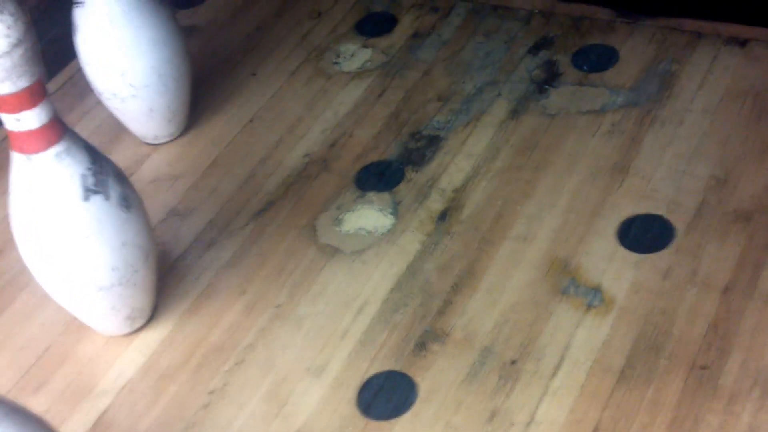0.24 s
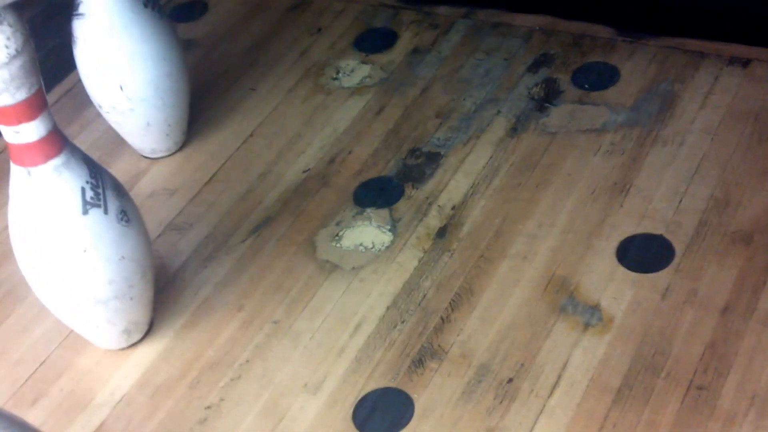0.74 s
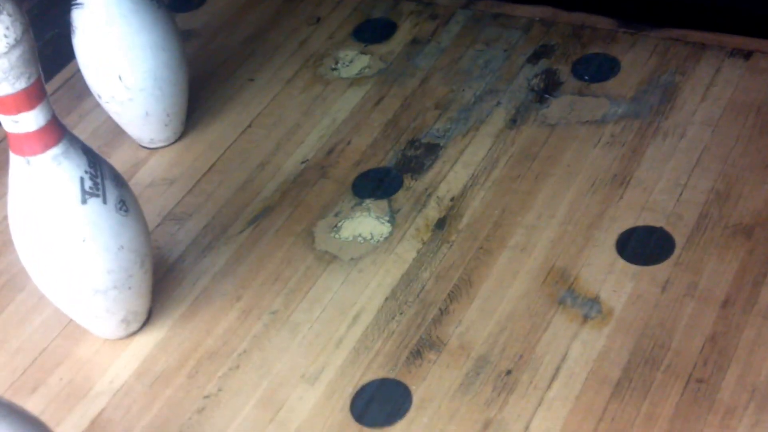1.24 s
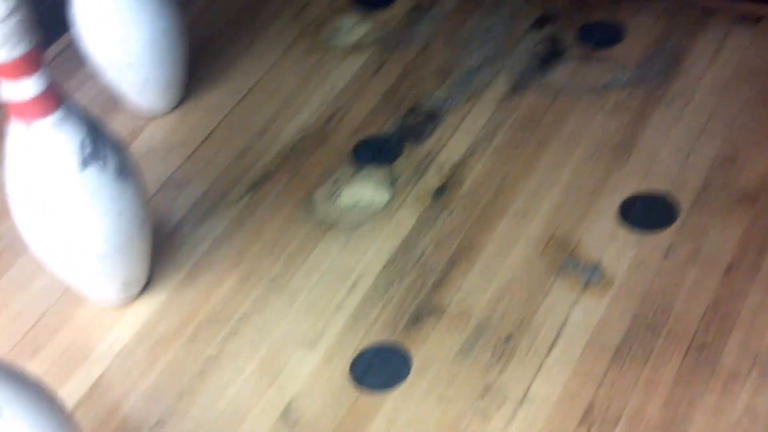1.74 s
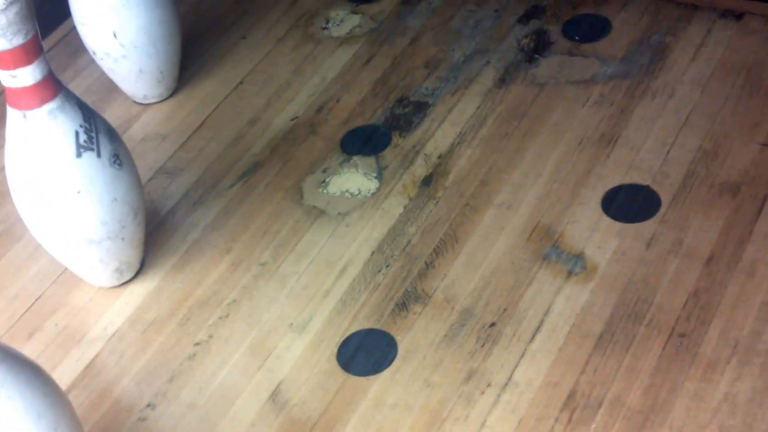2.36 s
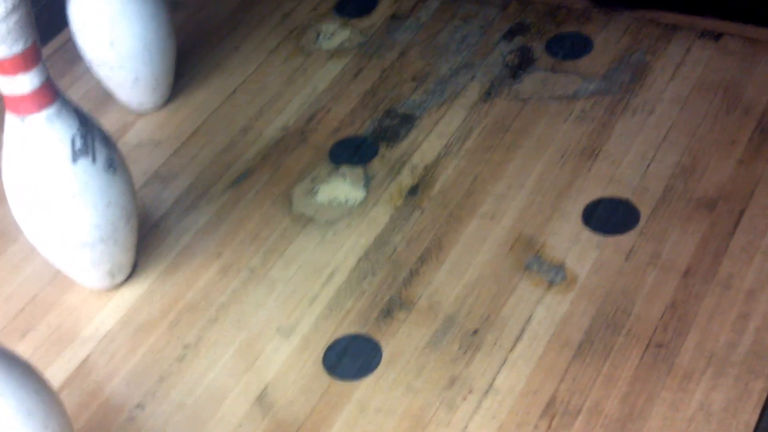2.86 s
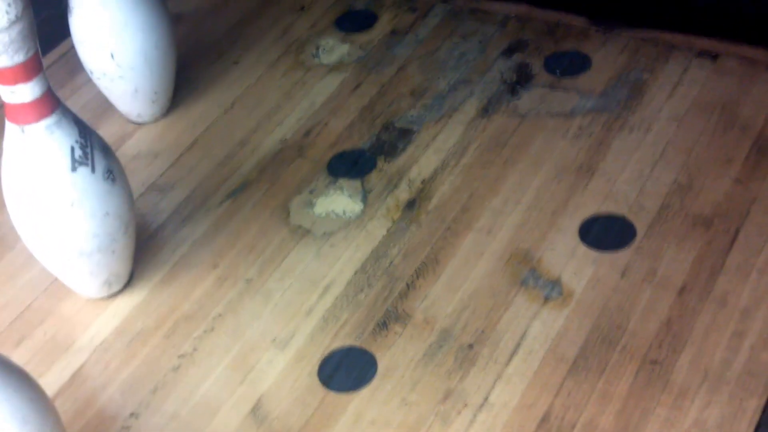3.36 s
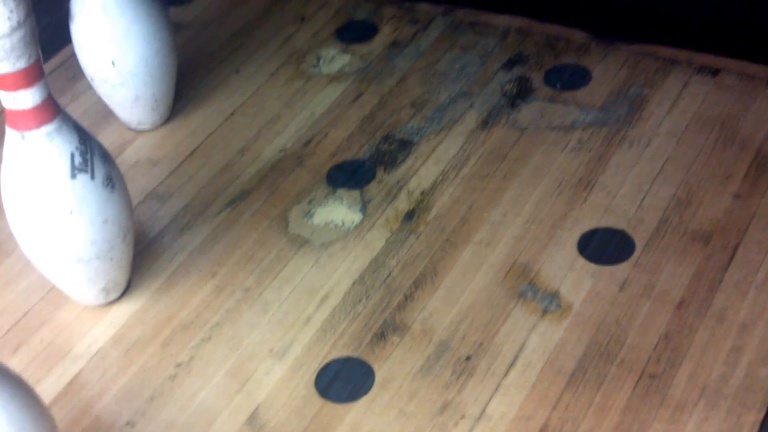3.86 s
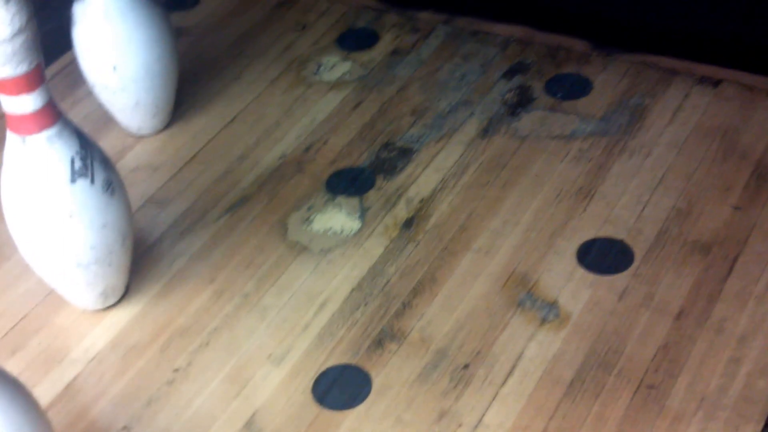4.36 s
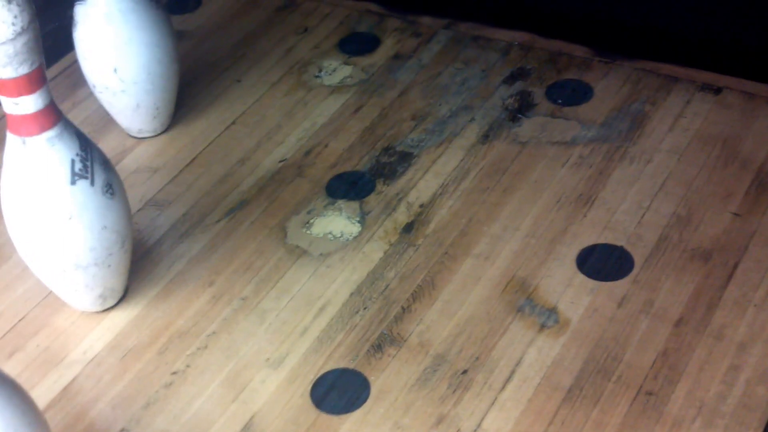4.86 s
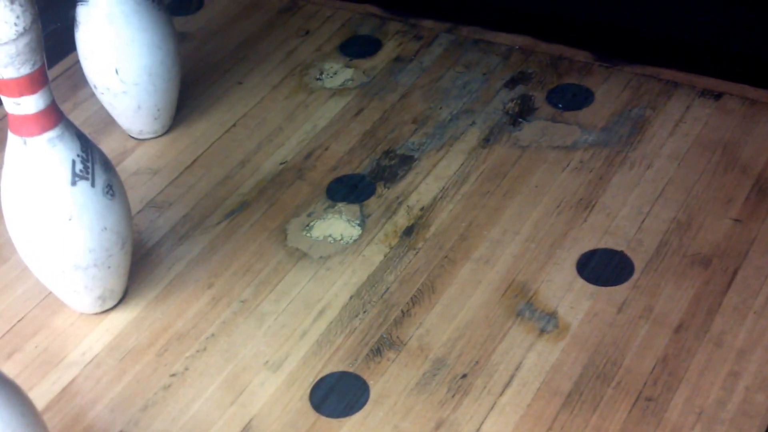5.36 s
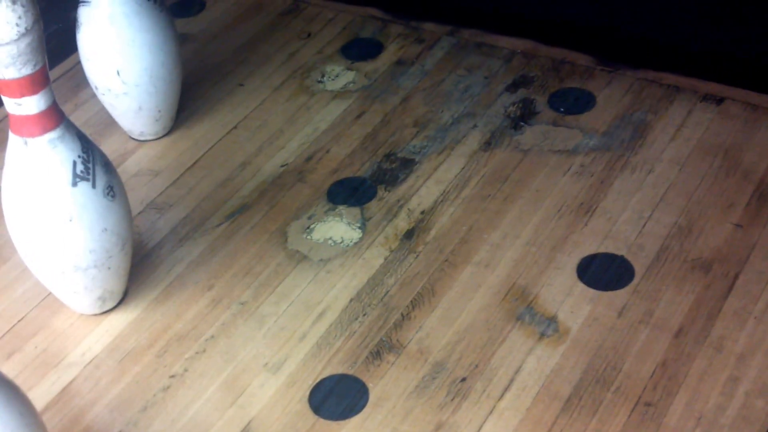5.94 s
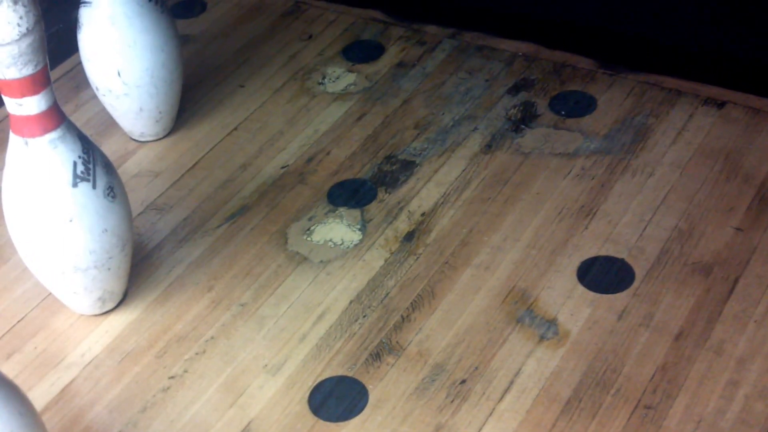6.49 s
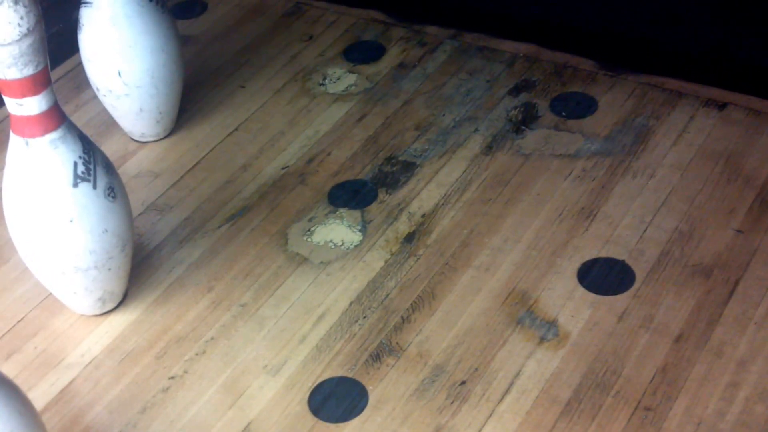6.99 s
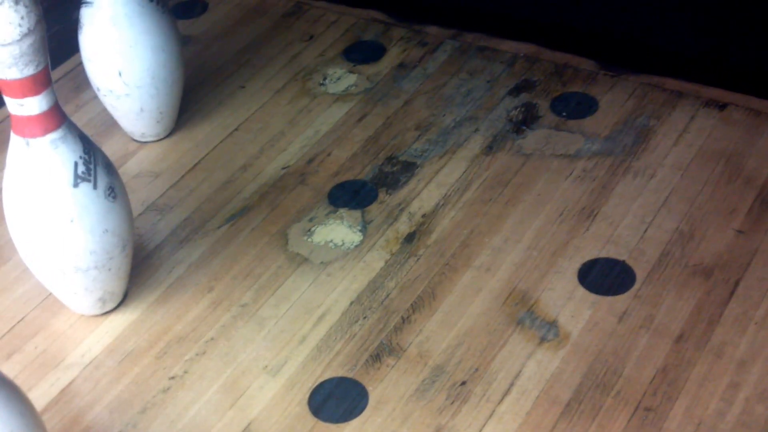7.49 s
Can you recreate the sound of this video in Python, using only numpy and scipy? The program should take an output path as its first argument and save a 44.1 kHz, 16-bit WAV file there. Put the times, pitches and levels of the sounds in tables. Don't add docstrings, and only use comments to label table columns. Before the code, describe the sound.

A continuous mechanical drone, whining on one unwavering pitch, with low hum, resonant metal housing and rough hiss. A few faint metallic ticks lead to one hard double-striking clack that jolts the whirr. The sound is suddenly quieter, then gradually swells to a steady level. Muffled wooden thumps, occasional higher knocks and small bright chain puffs continue behind it. Wide stereo from a small camera microphone, with the whine leaning right.

```python
import sys
import numpy as np
from scipy import signal
from scipy.fft import rfft, irfft, next_fast_len
from scipy.io import wavfile
from scipy.ndimage import uniform_filter1d, map_coordinates

SR = 44100
rng = np.random.default_rng(int(sys.argv[2]) if len(sys.argv) > 2 else 0)


def file_out(sig):
    cols = np.atleast_2d(sig).T
    lim = np.clip(cols, -1, 1)
    pcm = np.round(lim * 32767).astype(np.int16)
    wavfile.write(sys.argv[1], SR, pcm)


def gain_from_db(level_db):
    decades = np.asarray(level_db, float) / 20
    return 10 ** decades


N = 340452


def unit(x):
    return x / np.sqrt(np.mean(x ** 2) + 1e-20)


def along(points, hz, column=1):
    rows = np.array(points)
    return np.interp(np.log(hz + 1), np.log(rows[:, 0] + 1), rows[:, column])


def wobble(rate_hz):
    knots = rng.standard_normal(int(N * rate_hz / SR) + 4)
    return map_coordinates(knots, [np.arange(N) * rate_hz / SR])


def filtered(x, response):
    size = next_fast_len(N + 8192)
    hz = np.fft.rfftfreq(size, 1 / SR)
    return irfft(rfft(x, size) * response(hz), size)[..., :N]


def patchy(depth_db):
    z = signal.stft(rng.standard_normal((2, N)), nperseg=1024)[2]
    field = rng.standard_normal(z.shape[1:])
    for axis in (0, 1):
        field = uniform_filter1d(field, size=3, axis=axis)
    return signal.istft(z * gain_from_db(depth_db * unit(field)), nperseg=1024)[1][:, :N]


# frequency_hz, left_minus_right_db, coherence [0-1], left_lead_rad
PORTS = [(70.0, -5.1, 0.6, 1.26), (110.0, -5.8, 0.75, 0.78), (180.0, -3.6, 0.93, 0.34),
         (270.0, -4.3, 0.93, 0.19), (400.0, -7.3, 0.89, -0.0), (520.0, -6.8, 0.9, -0.38),
         (700.0, -8.4, 0.66, -0.72), (950.0, -3.2, 0.6, -0.52), (1200.0, -3.7, 0.27, -0.71),
         (1750.0, -3.0, 0.4, -3.56), (2300.0, -4.2, 0.02, -3.56), (4000.0, -2.5, 0.11, -3.56),
         (8000.0, -2.0, 0.05, -3.56), (11500.0, 1.1, 0.03, -3.56)]


def at_ports(pair, gain):
    def mixing(hz):
        angle = np.arccos(np.clip(along(PORTS, hz, column=2), 0, 1)) / 2
        return gain(hz) * np.array([np.cos(angle), np.sin(angle)])

    def balance(hz):
        left = gain_from_db(along(PORTS, hz) / 2) * np.exp(.5j * along(PORTS, hz, column=3))
        return [left, 1 / left]

    alike, apart = filtered(pair, mixing)
    return filtered(np.array([alike + apart, alike - apart]), balance)


MESH_HZ = 596.2
# multiple, right_db, left_minus_right_db, left_lead_rad
WHINE = [(1, -14.7, -10.8, -.5), (2, -50, 8.1, -.3), (3, -38, -24.5, .5), (4, -43.7, -5.6, 2.5),
         (5, -37, -15, -2.6), (6, -45.5, -12.4, 2.6), (7, -63, 10.2, -.1), (8, -54, -14.7, .2)]


def whine(level_db):
    phase = 2 * np.pi * np.cumsum(MESH_HZ + 0.32 * wobble(8)) / SR
    tone = 0
    for multiple, db, left_db, lead in WHINE:
        level = gain_from_db(db + 2.6 + .45 * multiple + .7 * wobble(25))
        left = gain_from_db(left_db) * np.sin(multiple * phase + lead)
        tone = tone + level * np.array([left, np.sin(multiple * phase)])
    return gain_from_db(level_db) * tone, phase


# frequency_hz, width_hz, level_db
HOUSING = [(165, 9.1, 9), (190, 24, 4.5), (264, 8.1, 3.5), (479.6, 97, 7), (888, 28, -2.5), (1311, 13, 5.5),
           (1403, 15, 1), (1903, 98, 2), (2136, 20, 3), (4060, 100, 3)]


def housing(hz):
    modes = sum(gain_from_db(2 * db) / (1 + (2 * (hz - centre) / width) ** 2) for centre, width, db in HOUSING)
    return np.sqrt(1 + modes)


# frequency_hz, density_db [dB per Hz]
RUMBLE = [(30, -26), (60, -21), (80, -16.5), (100, -7), (135, -6), (215, -6.5), (310, -7), (400, -6.5),
          (650, -7.5), (850, -10), (1050, -21), (1500, -26.5), (3000, -90)]
WHIRR = [(700, -32), (1000, -1), (1300, 2), (1700, 2), (2000, 0.5), (2500, -4.5), (3100, -3.5), (4100, -8),
         (4500, -16.5), (6000, -29), (9000, -90)]
HISS = [(2000, -20), (4400, -2.5), (5200, -6.5), (6200, -4), (7500, -4), (9000, -1.5), (11700, -2),
        (12600, -6), (13400, -8.5), (14200, -7), (15400, -10), (15650, -19)]


def drive(phase, rumble_db, whirr_db):
    rumble, whirr, hiss = patchy(depth_db=0.25), patchy(depth_db=1.5), patchy(depth_db=1.5)
    beat_db = .5 * np.sin(phase / 229) + 1.55 * wobble(8) + 1.56 * wobble(90) + 0.29 * np.sin(phase / 10)
    grit = gain_from_db(0.69 * wobble(1500) + 1.0 * np.sin(phase))
    rumble = rumble * gain_from_db(0.13 * wobble(6))
    whirr = whirr * gain_from_db(0.55 * beat_db) * grit ** .6
    hiss = hiss * gain_from_db(0.18 * beat_db) * grit
    rumble = at_ports(rumble, lambda hz: gain_from_db(along(RUMBLE, hz)) * housing(hz))
    whirr = at_ports(whirr, lambda hz: gain_from_db(along(WHIRR, hz)) * housing(hz))
    hiss = at_ports(hiss, lambda hz: gain_from_db(along(HISS, hz)))
    return gain_from_db(rumble_db - 20) * unit(rumble) + gain_from_db(whirr_db - 27) * unit(whirr) + gain_from_db(-29) * unit(hiss)


def contacts(rows, tilt_db, ring_db, chatter_db):
    out, t = np.zeros((2, N + SR)), np.arange(SR // 3) / SR
    hz = np.fft.rfftfreq(len(t), 1 / SR)
    tilt = gain_from_db(tilt_db * np.log2(hz / 8000 + .05))
    highpass = hz ** 2 / (hz ** 2 + 900 ** 2)
    lowpass = 1 / np.sqrt(1 + (hz / 12500) ** 8)
    colour = tilt * highpass * lowpass
    for start_s, db, t60_s, rise_s, ring_hz in rows:
        bounce = unit(uniform_filter1d(rng.standard_normal(len(t)), size=90))
        chatter = gain_from_db(chatter_db * (1 - np.exp(-t / 0.0096)) * bounce)
        noise = irfft(rfft(rng.standard_normal((2, len(t)))) * colour, len(t))
        burst = unit(chatter * noise)
        drift = np.cumsum(rng.normal(0, 0.082, len(t)))
        ring = gain_from_db(ring_db) * np.sin(2 * np.pi * ring_hz * t + drift)
        fade = gain_from_db(-60 * t / t60_s) * (1 - np.exp(-t / rise_s))
        out[:, round(start_s * SR):][:, :len(t)] += gain_from_db(db) * fade * (burst + ring)
    return at_ports(out[:, :N], lambda hz: gain_from_db(along(HISS, hz) * 0.08))


# start_s, level_db, t60_s, ring_hz
LATCH = [
    (0.9238, -9, 0.035, 6100),
    (0.928, 0.5, 0.099, 10550),
    (.934, -6.5, 0.36, 7230),
    (0.9541, 0.5, 0.055, 10640),
    (.958, 0, 0.092, 1850),
    (0.966, -11.5, 0.26, 9560),
]
STRIKE_S = LATCH[0][0]
# start_s, level_db, rise_s, ring_hz
TICKS = [
    (.103, -22, .004, 9800),
    (.254, -13, 0.0088, 10300),
    (.435, -14.5, 0.011, 7900),
    (1.14, -19.5, .003, 9000),
    (1.266, -14, .002, 9800),
    (1.465, -13.5, .004, 12500),
    (1.472, -19, .002, 9550),
]


def clacks():
    latch = [(s, db, t60, 0.00049, hz) for s, db, t60, hz in LATCH]
    ticks = [(s, db, 0.16, rise, hz) for s, db, rise, hz in TICKS]
    near = contacts(latch, tilt_db=1.2, ring_db=-5, chatter_db=3.5)
    far = contacts(ticks, tilt_db=2.5, ring_db=-10, chatter_db=5.0)
    return near + far


# start_s, peak_db, pitch_hz
THUMPS = [(.47, -21, 190), (.83, -21, 190), (1.02, -23, 310), (1.15, -23, 264), (1.17, -16, 405),
          (1.9, -22.5, 264), (1.91, -20, 165), (2.82, -23, 165), (3.56, -18, 173), (3.6, -19.5, 264),
          (3.71, -24, 172), (4.62, -22, 165), (4.64, -22.5, 264), (5.03, -33, 264), (5.39, -27, 175),
          (5.55, -24, 264), (5.81, -23, 163), (5.92, -21, 171), (6.12, -27, 264), (6.32, -21, 190),
          (6.44, -24.5, 177), (6.47, -24.5, 264), (6.85, -23, 264), (7.07, -22, 264), (7.44, -26, 111),
          (7.61, -22, 165)]
KNOCKS = [
    (.27, -15, 750),
    (4.61, -14.5, 1320),
    (4.86, -14, 1360),
    (6.272, -20, 1280),
    (6.338, -16, 746),
    (7.071, -13, 774),
]


def pins(hits, lift_db, t60_s):
    out, t = np.zeros(N + SR), np.arange(SR // 4) / SR
    for start_s, db, hz in hits:
        overtone = np.sin(2 * np.pi * 1.6 * hz * t + rng.uniform(0, 9.6))
        ring = np.sin(2 * np.pi * hz * t) + 0.15 * overtone
        fade = gain_from_db(db + lift_db - 60 * t / t60_s) * (1 - np.exp(-t / 0.0013))
        out[round(start_s * SR):][:len(t)] += fade * ring
    return at_ports(np.array([out[:N], 0 * out[:N]]), lambda hz: 1)


RATTLE_S = [1.649, 2.179, 2.393, 2.645, 2.889, 3.211, 3.343, 3.674, 4.313, 4.752, 4.952, 5.144, 5.659,
            6.173, 6.752]


def chain():
    t, strikes = np.arange(SR // 8) / SR, np.zeros(N)
    strikes[np.round(np.array(RATTLE_S) * SR).astype(int)] = gain_from_db(-26.5)
    fade = gain_from_db(-60 * t / .15) * (1 - np.exp(-t / .003))
    puffs = signal.fftconvolve(strikes, fade)[:N]
    noise = puffs * rng.standard_normal((2, N))
    return at_ports(noise, lambda hz: gain_from_db(along(HISS, hz) + 1.5 * np.log2(hz / 9000 + .01)))


def motor():
    phase = 2 * np.pi * np.cumsum(57.5 + 0.12 * wobble(3.0)) / SR
    return gain_from_db(-39.5 + 0.8 * wobble(4.67)) * np.array([.3 * np.cos(phase), np.sin(phase)])


def scene():
    since = np.arange(N) / SR - STRIKE_S
    body_db = 13 * (since > 0) * np.exp(-np.abs(since) / 0.11)
    tone, phase = whine(level_db=-0.37)
    machine = gain_from_db(0.83) * (tone + drive(phase, rumble_db=0.82, whirr_db=1.69 + body_db) + motor())
    thumps = pins(THUMPS, lift_db=7.0, t60_s=0.28)
    knocks = pins(KNOCKS, lift_db=3.0, t60_s=0.041)
    return machine + clacks() + thumps + knocks + chain()


def gain_control():
    start_cut_db, duck_cut_db, creep_db_per_s, knee_db = 7, 13.5, 3.5, 0.8
    lag_s, duck_s = 0.003, 0.0023
    t = np.arange(N) / SR
    since = np.clip(t - STRIKE_S - lag_s, 0, None)
    ducked = 1 - np.exp(-since / duck_s)
    first_db = start_cut_db - creep_db_per_s * t
    second_db = duck_cut_db - creep_db_per_s * since
    cut_db = (1 - ducked) * first_db + ducked * second_db
    return gain_from_db(-knee_db * np.logaddexp(0, cut_db / knee_db))


def roll_off(x):
    return signal.sosfilt(signal.butter(12, 15810, fs=SR, output="sos"), x)


def record(dry):
    dry = dry * gain_control()
    delay = 16
    late = np.pad(dry, ((0, 0), (delay, 0)))[::-1, :N]
    wide = dry - late * [[.53], [1.05]]
    return roll_off(np.clip(wide, -1, 1))


dry = scene()
out = record(dry)
file_out(out)
```